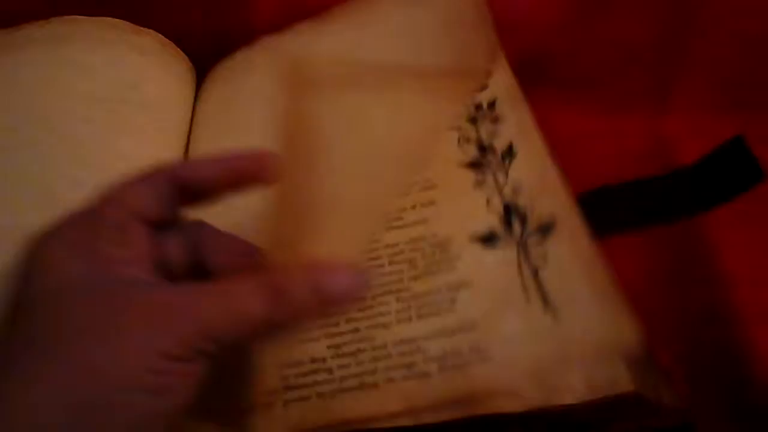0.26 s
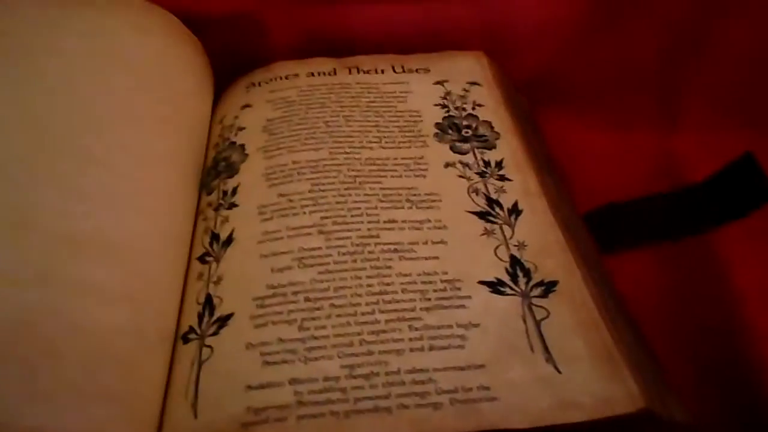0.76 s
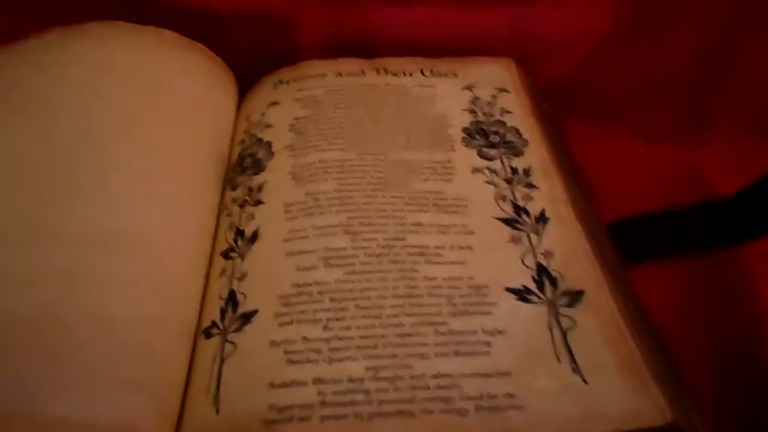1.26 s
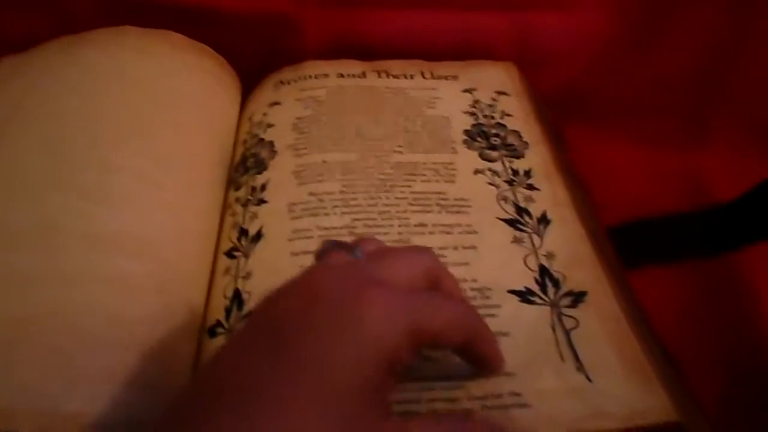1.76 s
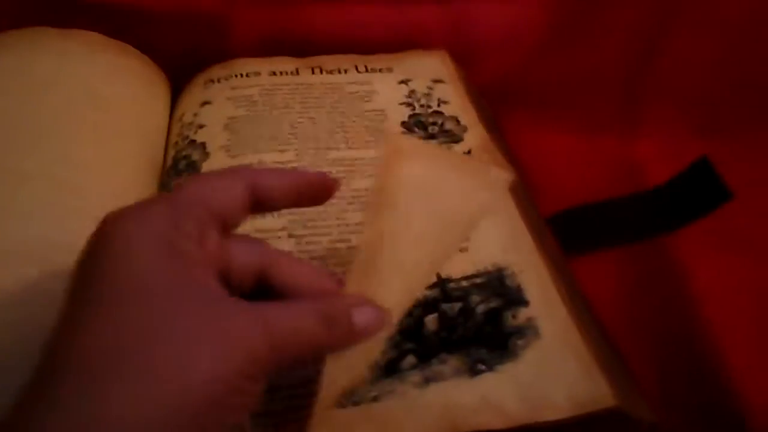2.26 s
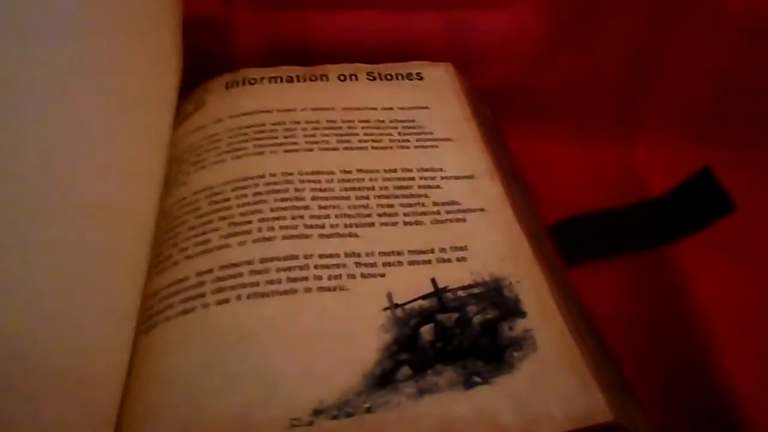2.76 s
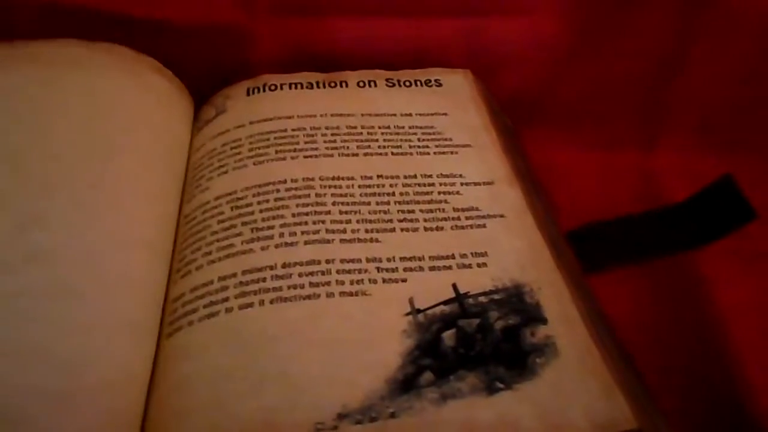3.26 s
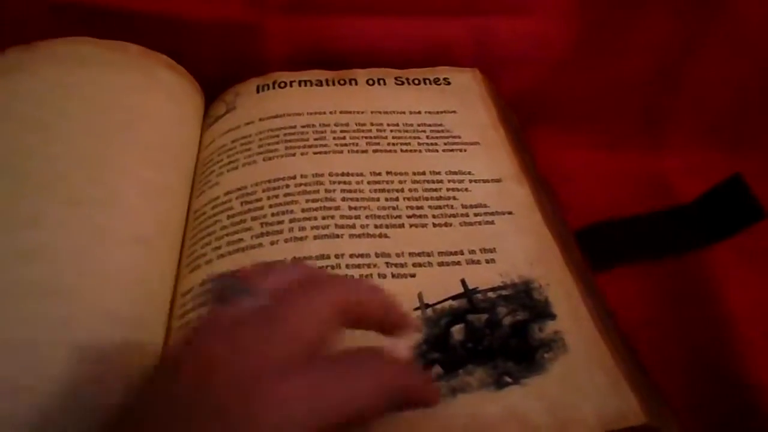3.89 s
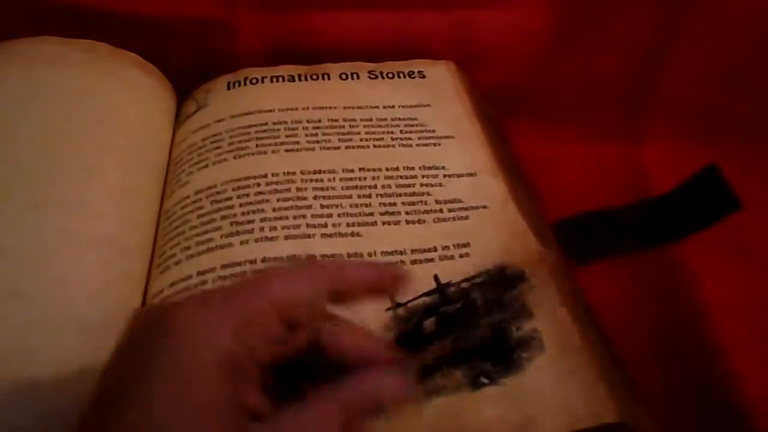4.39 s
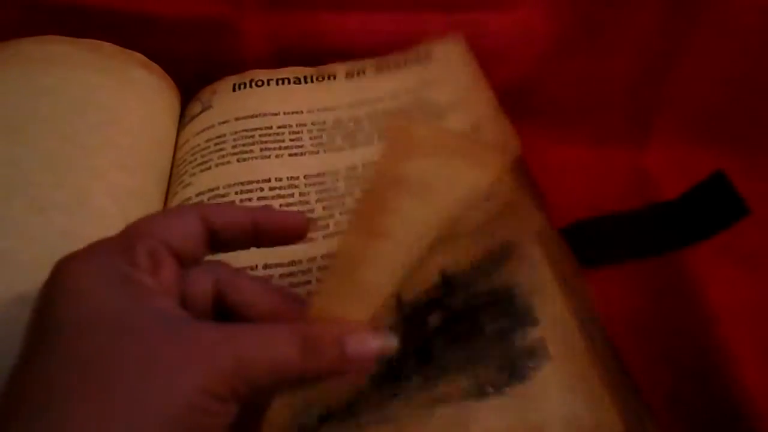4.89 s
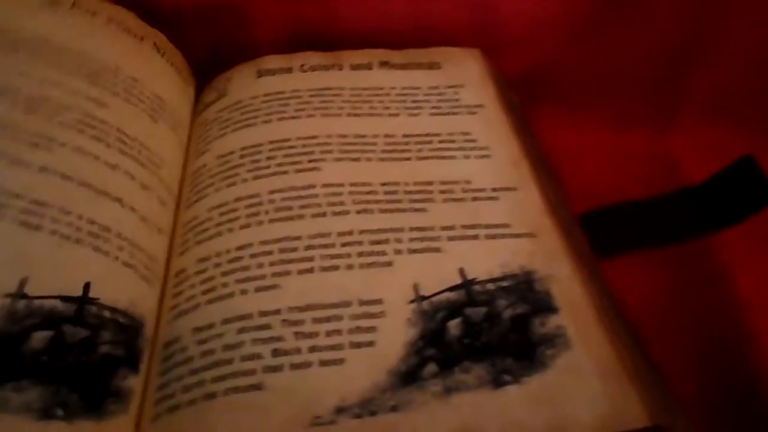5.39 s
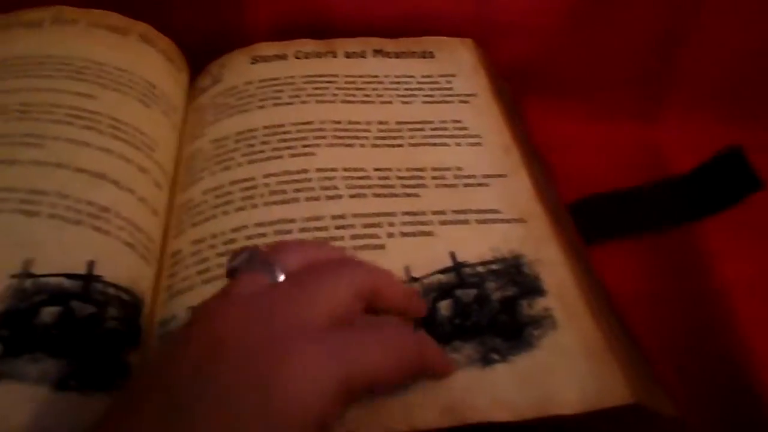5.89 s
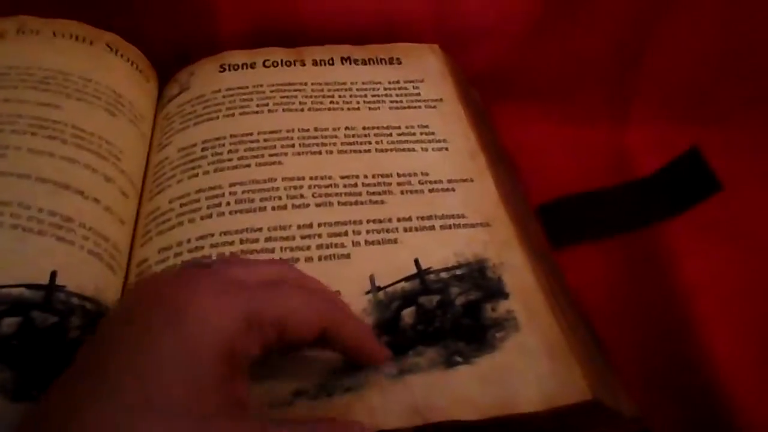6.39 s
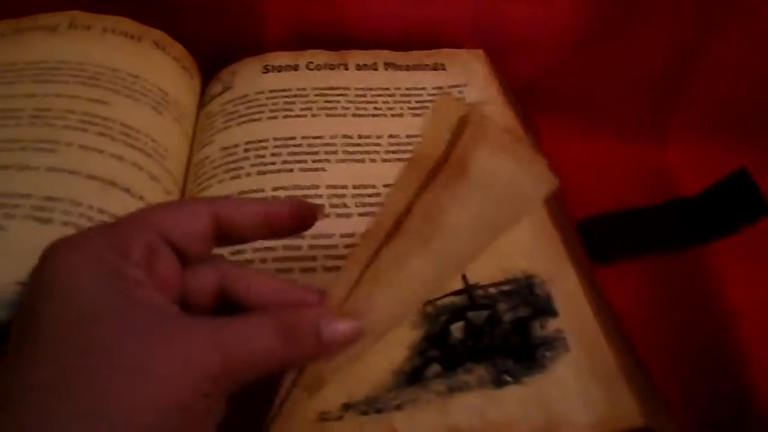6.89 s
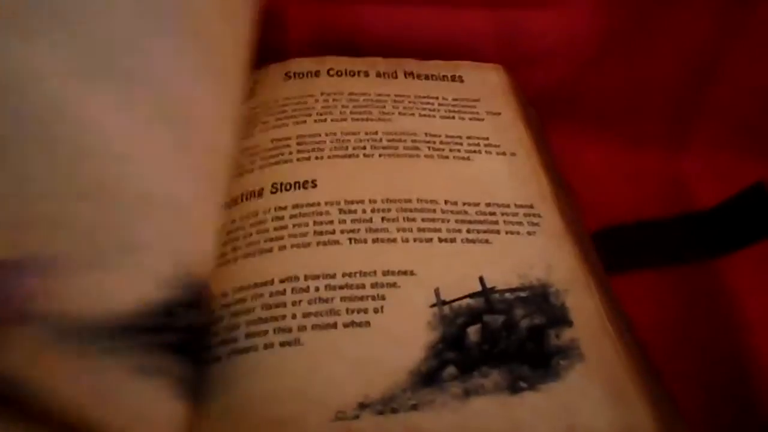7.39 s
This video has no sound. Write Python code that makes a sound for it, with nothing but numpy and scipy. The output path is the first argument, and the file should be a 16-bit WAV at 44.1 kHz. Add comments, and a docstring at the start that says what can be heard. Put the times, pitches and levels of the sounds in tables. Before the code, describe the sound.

A hand turns thick, dry pages in a quiet rumbling room; sheets slide, crackle and flop down, interrupted once by a sharp double switch click.

```python
"""Turning stiff book pages

A hand turns the stiff pages of a thick book close to a small microphone in a quiet, rumbling room.
Shaped noise gives sliding, flexing and pushed air; scrapes with pops, cracks and crunches are the sheets snapping.
A small plastic switch clicks in and out as a sum of decaying modes; a faint low sine hum comes and goes.
The gain control lowers everything after the loud clicks."""
import sys
import numpy as np
from scipy import signal
from scipy.io import wavfile
from scipy.ndimage import uniform_filter1d

SR = 44100
rng = np.random.default_rng(int(sys.argv[2]) if len(sys.argv) > 2 else 0)


def decibels_to_gain(level_db):
    """Convert a level in decibels to a linear amplitude gain (20 dB per decade)."""
    exponent = np.asarray(level_db, float) / 20
    return 10 ** exponent


def generate_wav(signal):
    """Clip the signal to [-1, 1] and save it as 16-bit WAV at the path in sys.argv[1]."""
    frames = np.transpose(np.atleast_2d(signal))
    scaled = np.clip(frames, -1, 1) * 32767
    pcm = np.round(scaled).astype(np.int16)
    wavfile.write(sys.argv[1], SR, pcm)


N = 337365

# spectrum of paper sliding on paper: (frequency [Hz], relative density [dB])
SLIDE_SPECTRUM = [(530, -33), (900, -3.5), (1460, -4), (3190, -4.5), (4070, -3), (7660, -6.5), (8760, -4),
                  (10400, -2.5), (15200, -26.5), (15900, -26.5), (16500, -55)]
CREST_DB = 7  # assumed peak of a short noise burst over its rms


def evened(x):
    """Scales to rms 1."""
    return x / np.sqrt(np.mean(x ** 2) + 1e-20)


def read(points, hz):
    """Reads a spectrum on a log-frequency axis."""
    f, value = np.transpose(points)
    return np.interp(np.log(hz + 1), np.log(f + 1), value)


def add(mix, start_s, sound):
    """Mixes a sound in at start_s."""
    part = mix[max(round(start_s * SR), 0):][:len(sound)]
    part += sound[:len(part)]


def noise(colour, patchy_db, size=512, extra_db=None):
    """Random short-time spectra with drifting patches; extra_db(t, hz) bends the colour over time."""
    hop = size // 4
    hz = np.arange(size // 2 + 1) * SR / size
    frames = N // hop + 5
    real, imag, patches = rng.standard_normal((frames, len(hz), 3)).T
    patches = uniform_filter1d(patches, size=4, axis=0)  # over frequency
    patches = evened(uniform_filter1d(patches, size=20, axis=1))  # over time
    db = read(colour, hz)[:, None] + patchy_db * patches
    if extra_db:
        db = db + extra_db(np.arange(frames) * hop / SR, hz[:, None])
    spectra = (real + 1j * imag) * decibels_to_gain(db)
    return evened(signal.istft(spectra, nperseg=size, noverlap=size - hop)[1][:N])


def gritty(depth_db, smooth_s):
    """Uneven catching of paper fibres: a fast random gain."""
    drift = uniform_filter1d(rng.standard_normal(N), size=max(int(smooth_s * SR), 1))
    return decibels_to_gain(depth_db * evened(drift))


def pages():
    """Sliding hiss coloured by air pockets, the duller flexing of the sheet and the air it pushes."""
    # air between two parting sheets resonates:
    # (centre time [s], 1/e half-width [s], frequency [Hz], change of level [dB])
    pockets = [(0.276, 0.062, 1840, 6.5), (2.218, .04, 4320, 4), (4.892, 0.025, 2200, 9.5),
               (4.97, .05, 4200, 8.5), (4.994, .04, 1550, 18), (7.093, 0.035, 2000, 5),
               (7.185, .03, 3280, -1)]
    # flexing sheet: (frequency [Hz], relative density [dB])
    flex_spectrum = [(450, -25.5), (750, -0.5), (1000, 0), (1300, 3.5), (1800, -7), (2800, -11),
                     (5000, -38)]
    # pushed air: (frequency [Hz], relative density [dB])
    push_spectrum = [(80, -26.5), (150, 3.5), (300, -0.5), (480, 2), (620, -19), (1000, -60)]
    crackle_db = -6  # relative to the bend level

    def colour_db(at, hz):
        """Tilts the hiss by stroke brightness; each pocket raises or slightly lowers one band for a moment."""
        db = stroking(at)[1] * np.log2((hz + 300) / 6000)
        for mid_s, width_s, pocket_hz, change_db in pockets:
            moment = np.exp(-((at - mid_s) / width_s) ** 2)
            band = np.exp(-(np.log((hz + 1) / pocket_hz) / 0.12) ** 2)
            db = db + change_db * moment * band
        return db

    slide = evened(noise(SLIDE_SPECTRUM, 3.17, extra_db=colour_db) * gritty(1.13, 0.0045))
    flex = evened(noise(flex_spectrum, 2.1) * gritty(2.6, 0.003))
    push = evened(noise(push_spectrum, 1.5, size=1024) * gritty(1.5, 0.012))

    t = np.arange(N) / SR
    grid_s = np.arange(0, N / SR, 0.001)
    powers = (stroking(grid_s)[0], *bending(grid_s))
    slide_gain, flex_gain, push_gain = [np.interp(t, grid_s, np.sqrt(power)) for power in powers]
    bend = 0.9 * flex + decibels_to_gain(crackle_db) * crackle()
    return slide_gain * slide + flex_gain * bend + push_gain * push


def stroking(t):
    """Power of all strokes at times t, and their brightness weighted by that power."""
    # strokes of paper on paper: (start [s], length [s], level at start [dB], level at end [dB],
    # brightness [dB per octave])
    strokes = [ (0.02, .06, -58, -59, -1.2), (0.118, .06, -47, -55, 3), (0.19, .088, -50, -35.5, -1.2),
               (0.3, .205, -42.5, -49.5, 1.6), (0.552, .075, -47, -46, -0.6), (0.63, .095, -54, -58, 1.1),
               (0.762, .035, -49, -47, 1.1), (0.815, .095, -51, -47, 4.5), (0.915, .06, -50, -60, 1.1),
               (0.99, .045, -61, -57, -2.1), (1.046, .035, -46, -54, -1.1), (1.09, .19, -66, -62, 1.1),
               (1.287, .03, -50, -53, -3), (1.338, .065, -46, -47, 1.1), (1.41, .19, -60, -67, 1.1),
               (1.608, .005, -60, -59, 3), (1.795, .06, -62, -66, 6), (1.99, .056, -63, -48.5, 0.1),
               (2.06, .04, -56, -62, 2.1), (2.113, .05, -51, -56.5, 1.6), (2.17, .092, -57, -51, 3),
               (2.38, .28, -68, -65, 2.1), (2.585, .04, -58, -66, 2.1), (2.7, .06, -60, -62, 0.1),
               (2.768, .062, -55, -57, -5), (2.87, .028, -55, -53, -1.1), (2.935, .178, -55, -54, 0.1),
               (3.145, .1, -59, -56, 3), (3.272, .03, -60, -64, 0.1), (3.3, .23, -66, -68, 2.1),
               (3.362, .014, -57, -56, -4), (3.555, .07, -60, -68, 5), (3.665, .105, -52, -48, 0.1),
               (4.44, .165, -70, -53.5, 4), (4.65, .004, -61, -61, 5), (4.69, .06, -60, -59, -1.1),
               (4.769, .008, -52, -53, 0.1), (4.79, .05, -60, -66, 0.1), (4.85, .045, -60, -38, -0.6),
               (4.915, .07, -47, -41, -1.1), (5.0, .238, -45, -48.5, 1.1), (5.29, .08, -46, -63, -1.1),
               (5.41, .055, -60, -54, 1.1), (5.51, .14, -49.5, -39, 1.1), (5.675, .2, -54, -69, 1.1),
               (6.29, .03, -66, -63, -1.1), (6.33, .2, -68, -66, -1.1), (6.54, .04, -66, -62, 3),
               (6.607, .003, -60, -60, 8), (6.687, .003, -63, -63, 8), (6.77, .078, -58, -58, 6),
               (6.925, .024, -63, -54, 2.1), (6.96, .05, -63, -67, 1.1), (7.03, .04, -62, -42, 0.1),
               (7.078, .035, -43, -48, -1.1), (7.115, .035, -57, -63, 1.1), (7.19, .085, -41, -56, 1.1),
               (7.315, .04, -52, -46.5, 3), (7.36, .06, -48, -54, 0.1), (7.44, .09, -47, -51, -1.1)]
    grip_db_per_s, let_go_db_per_s = 1100, 650
    power, bright = 1e-12, 0
    for start_s, length_s, first_db, last_db, bright_db in strokes:
        u = t - start_s
        db = first_db + (last_db - first_db) * np.clip(u / length_s, 0, 1)
        db = db + grip_db_per_s * np.minimum(u, 0)
        db = db - let_go_db_per_s * np.maximum(u - length_s, 0)
        one = decibels_to_gain(db) ** 2
        power = power + one
        bright = bright + bright_db * one
    return power, bright / power


def bending(t):
    """Power of the flexing and of the pushed air at times t: each bend swells to a peak and fades."""
    # the sheet bends or settles: (peak time [s], flexing level [dB], time to build 20 dB [s],
    # time to lose 20 dB [s], pushed air over flexing [dB])
    bends = [ (0.056, -56, .1, .06, -15), (0.12, -56, .05, .09, -14), (0.3, -52, .25, .07, -18),
             (0.472, -62, .09, .02, 6), (0.61, -52, .1, .06, -16), (0.678, -41, .05, .16, -8),
             (0.772, -46, .06, .1, -14), (0.84, -51.5, .06, .39, -3), (1.21, -50, .02, .1, 5),
             (1.33, -57, .1, .15, 5), (1.428, -48, .12, .07, -3), (2.032, -54, .015, .03, -16),
             (2.664, -48, .025, .06, -6), (2.82, -57, .1, .04, -4), (2.89, -63, .1, .1, 12),
             (2.956, -47, .055, .07, -3), (3.024, -51, .03, .02, -11), (3.06, -54.5, .03, .08, -15),
             (3.168, -52, .02, .035, -23), (3.272, -56.5, .15, .045, -15), (3.4, -66, .2, .2, 2.1),
             (3.545, -51, .012, .12, 4), (3.6, -51, .05, .05, -6), (3.66, -49, .03, .2, -1.1),
             (3.77, -51, .15, .04, -3), (4.748, -58, .08, .15, -5), (4.88, -48, .05, .15, -16),
             (4.996, -50, .2, .09, -30), (5.22, -61, .4, .05, 4), (5.32, -47, .04, .06, -6),
             (5.357, -49, .02, .05, -2.1), (5.44, -53, .1, .05, 2.1), (5.51, -53, .04, .12, 3),
             (5.605, -48, .03, .06, 2.5), (5.65, -50, .03, .04, -2.1), (5.696, -47, .05, .045, -15),
             (6.46, -61, .1, .2, -9), (7.08, -54, .065, .055, -4), (7.2, -53, .03, .1, -15),
             (7.39, -66, .1, .2, 11), (7.512, -48.5, .12, .05, -15), (7.576, -48.5, .025, .025, -9),
             (7.61, -50, .025, .03, -7), (7.636, -39, .015, .1, -11)]
    flex, push = 0, 0
    for peak_s, db, build_s, lose_s, push_db in bends:
        drop = np.maximum((peak_s - t) / build_s, (t - peak_s) / lose_s)
        one = decibels_to_gain(db - 20 * drop) ** 2
        flex = flex + one
        push = push + one * decibels_to_gain(push_db) ** 2
    return flex, push


def crackle():
    """Dense tiny buckles of the bending sheet, each a soft-edged grain of a cycle or two at one of six pitches."""
    rate_per_s, spread_db = 260, 3.2
    chance, size, kind = rng.random((N, 3)).T
    hits = (chance < rate_per_s / SR) * decibels_to_gain(-spread_db * np.log(size + 0.04))
    t = np.arange(400) / SR
    pitches_hz = np.geomspace(750, 1800, num=6)
    kind = (kind * len(pitches_hz)).astype(int)
    out = np.zeros(N)
    for k, hz in enumerate(pitches_hz):
        grain = hz * t * decibels_to_gain(-14 * hz * t) * np.sin(2 * np.pi * hz * t)
        out += signal.oaconvolve(hits * (kind == k), grain)[:N]
    return evened(out)


def snaps():
    """A quick scrape of the sheet dies away; a pop of a few cycles and a dull thud, strong or hardly heard, start it."""
    # snapping sheets: (time [s], scrape peak [dB], pop over scrape [dB], pop frequency [Hz],
    # scrape fall to -80 dB [s])
    snap_list = [(1.1932, -32.5, 9, 880, 0.04), (1.2483, -35.5, 11, 1000, 0.055),
                 (1.2865, -44, 12, 700, 0.04), (2.3166, -37, -26, 1690, 0.06),
                 (2.355, -34, -17, 945, 0.062), (2.4768, -32.5, -1, 820, 0.05),
                 (2.5657, -31.5, 7, 1140, 0.047), (2.6607, -32, 8.5, 1150, 0.064),
                 (2.6983, -39, -21, 1370, 0.056), (2.8699, -44, 7.5, 888, 0.053),
                 (3.4116, -42, 1, 1440, 0.053), (3.539, -36.5, 12.5, 1060, 0.053),
                 (3.6576, -38, 11.5, 1120, 0.065), (5.2729, -33.5, -1.5, 1010, 0.06),
                 (5.4975, -38.5, 1, 1050, 0.093), (7.1672, -25.5, -9, 1290, 0.076),
                 (7.2906, -31.5, -5, 2040, 0.06), (7.3083, -35, 1, 1400, 0.076),
                 (7.6299, -37.5, 2, 1270, 0.13)]
    out, t = np.zeros(N), np.arange(9000) / SR
    hiss = noise(SLIDE_SPECTRUM, 1.14, size=256, extra_db=lambda at, hz: 7.4 * (hz / 15000) ** 3)
    thud = decibels_to_gain(-11.5 - 60 * t / 0.052) * np.sin(2 * np.pi * 230 * t * np.exp(-t / 0.023))
    pop_fade = decibels_to_gain(-60 * t / 0.0082) + 0.76 * decibels_to_gain(-60 * t / 0.0005)  # sharp first swing
    for start_s, db, pop_db, pop_hz, fall_s in snap_list:
        at = round(start_s * SR)
        u = t / fall_s
        fade_db = -20 * u - 60 * u ** 2  # slow at first, then steep
        scrape = decibels_to_gain(db - CREST_DB + fade_db) * np.minimum(t / 0.00018, 1)
        add(out, start_s, scrape[:N - at] * hiss[at:at + len(t)])
        pop = pop_fade * np.sin(2 * np.pi * pop_hz * t + 0.6)
        add(out, start_s, decibels_to_gain(db + pop_db) * (pop + thud))
    return out


def crunches():
    """A cluster of small buckles rings the landing sheet around one pitch: quick rise, ragged fall."""
    # crumpling: (time [s], nominal peak [dB], frequency [Hz], length [s])
    crunch_list = [(0.669, -26, 1310, 0.029), (0.674, -34, 2350, 0.02), (0.762, -39, 1920, 0.022),
                   (1.318, -26, 1340, 0.014), (1.358, -30.5, 1540, 0.02), (3.693, -27, 1300, 0.02),
                   (3.747, -32, 1340, 0.028), (5.434, -32, 1150, 0.023), (5.515, -30.5, 1100, 0.023),
                   (5.588, -29.5, 1350, 0.018), (5.609, -31.5, 1060, 0.011), (5.691, -33, 1220, 0.017),
                   (7.451, -30.5, 1230, 0.026), (7.487, -38, 1290, 0.014)]
    out, t = np.zeros(N), np.arange(2000) / SR
    for start_s, db, hz, length_s in crunch_list:
        size, chance = rng.standard_normal((len(t), 2)).T
        buckles = size * (chance > 1.6)  # sparse
        ring = decibels_to_gain(-60 * t / 0.0054) * np.sin(2 * np.pi * hz * t)
        crumple = evened(signal.fftconvolve(buckles, ring)[:len(t)])
        u = 5 * t / length_s  # envelope peaks at a fifth of the length
        add(out, start_s, decibels_to_gain(db - CREST_DB) * u * np.exp(1 - u) * crumple)
    return out


def cracks():
    """A crease or page edge gives way: a few milliseconds of wide noise with no ring."""
    # dry cracks: (time [s], nominal peak [dB], length [s])
    crack_list = [(0.038, -33, 0.0035), (0.4095, -28.5, 0.0045), (1.1488, -44, 0.004), (1.18, -40, 0.0055),
                  (1.7896, -32, 0.0013), (1.8407, -42, 0.0034), (1.98, -46, 0.0047), (2.686, -45, 0.0044),
                  (2.943, -39, 0.004), (5.1037, -24.5, 0.0085), (5.658, -27, 0.0031), (7.573, -38, 0.003)]
    out = np.zeros(N)
    spectrum = [(700, -17), (1800, 0), (6000, 0), (11000, 0.5), (15500, -22), (17000, -52)]
    wide = noise(spectrum, 3.0, size=128)
    for start_s, db, length_s in crack_list:
        at, count = round(start_s * SR), round(length_s * SR)
        fade = np.sqrt(np.linspace(1, 0, count))
        add(out, start_s, decibels_to_gain(db - CREST_DB) * fade[:N - at] * wide[at:at + count])
    return out


def switch():
    """Each click strikes the same short modes of the housing, too small to radiate bass."""
    # (time [s], level [dB], brightness [dB per octave])
    clicks = [(1.62940, -6.5, 0.5), (1.7521, -2.1, 1.1)]
    # modes: (frequency [Hz], level [dB], t60 [s], polarity [+1 or -1])
    housing = [(2260, -12, .016, 1), (3930, -13, .014, 1), (2800, -22, .005, -1), (4500, 0, .006, 1),
               (5400, -12, .005, -1), (6500, -12, .004, -1), (8250, -4, .0035, 1), (9800, -13, .003, -1),
               (11800, -13, .003, -1), (13000, -20, .002, -1), (14900, -11, .0015, 1)]
    out, t = np.zeros(N), np.arange(2000) / SR
    for start_s, db, bright_db in clicks:
        ring = np.zeros(len(t))
        for hz, mode_db, t60_s, polarity in housing:
            level_db = mode_db + bright_db * np.log2(hz / 4500)
            ring += polarity * decibels_to_gain(level_db - 60 * t / t60_s) * np.sin(2 * np.pi * hz * t)
        add(out, start_s, decibels_to_gain(db) * ring * np.minimum(t / 0.00025, 1))
    return signal.sosfilt(signal.butter(2, 1700, "high", fs=SR, output="sos"), out)


def hum():
    """A soft low sine that starts quickly and fades."""
    # (start [s], length [s], initial rms before edge taper [dB])
    hums = [(.03, .1, -55.5), (.83, 0.32, -53.5), (3.0, 0.285, -53), (5.22, 0.3, -53.5), (7.4, 0.26, -53.5)]
    hum_hz = 203
    out = np.zeros(N)
    for start_s, length_s, db in hums:
        t = np.arange(0, length_s, 1 / SR)
        fade = np.sqrt(2) * decibels_to_gain(db - 6 * t / length_s) * signal.windows.tukey(len(t), 0.3)
        add(out, start_s, fade * np.sin(2 * np.pi * hum_hz * t))
    return out


def room():
    """Steady room rumble and microphone hiss as one shaped noise."""
    # (frequency [Hz], relative density [dB])
    room_spectrum = [(12, -27), (24, -2), (35, 0), (46, -2), (60, -3), (82, -18), (110, -13), (150, -22),
                     (260, -28), (430, -31), (620, -36), (1330, -36.5), (1500, -37.5), (1750, -40),
                     (2300, -45.5), (7500, -51), (10000, -47.5), (12500, -54.5), (15900, -55.5),
                     (16500, -92)]
    rms_db = -41.5
    return decibels_to_gain(rms_db) * noise(room_spectrum, 1.0, size=4096)


def scene():
    """Everything reaches one microphone."""
    mix = pages() + snaps() + crunches() + cracks() + switch() + hum() + room()
    return mix[None]


def top_cut(x):
    """Nothing passes above the cut-off."""
    return signal.sosfilt(signal.butter(12, 17070, fs=SR, output="sos"), x)


def record(dry):
    """Gain control drops at a loud peak and creeps back."""
    threshold_db, cut_db_per_db = -28, 0.39
    peak_db = 10 * np.log10(uniform_filter1d(dry[0] ** 2, size=200) + 1e-12)
    fall_db = np.arange(N) * 14.5 / SR  # the held peak sinks 14.5 dB a second
    held_db = np.maximum.accumulate(peak_db + fall_db) - fall_db
    over_db = np.maximum(held_db - threshold_db, 0)
    late_db = signal.lfilter([0.004], [1, -0.996], over_db)  # the gain lags the peak
    return top_cut(dry / decibels_to_gain(cut_db_per_db * late_db))


dry = scene()
out = record(dry)
generate_wav(out)
```